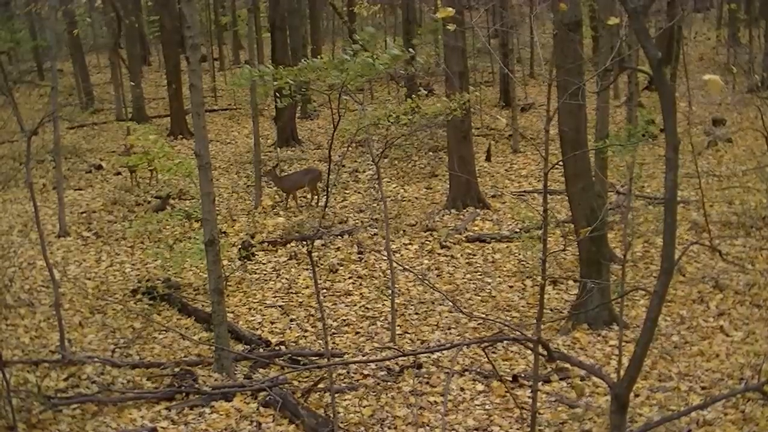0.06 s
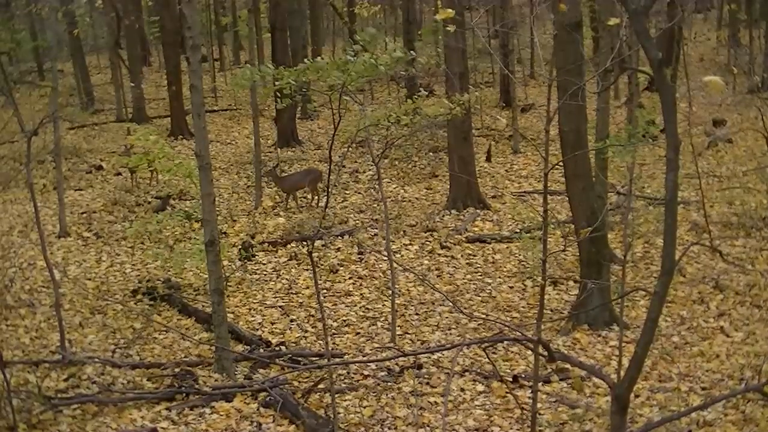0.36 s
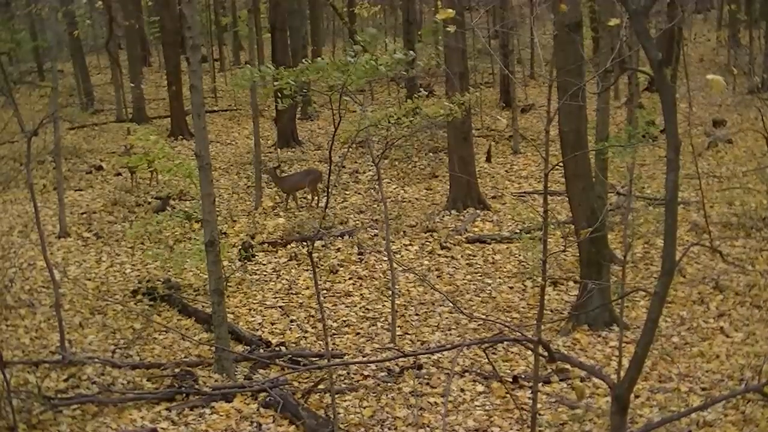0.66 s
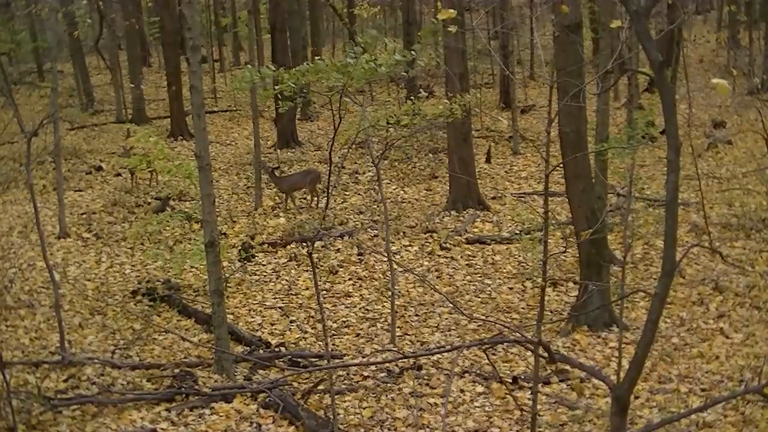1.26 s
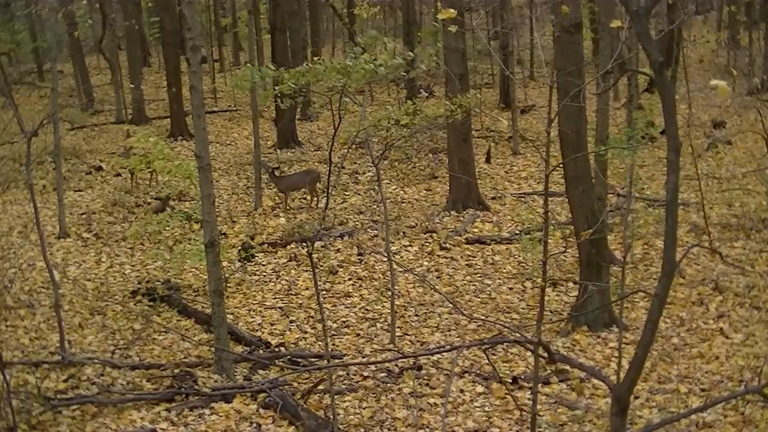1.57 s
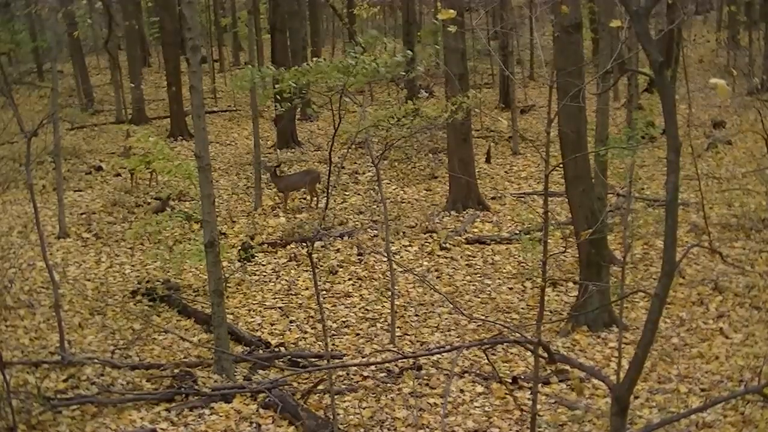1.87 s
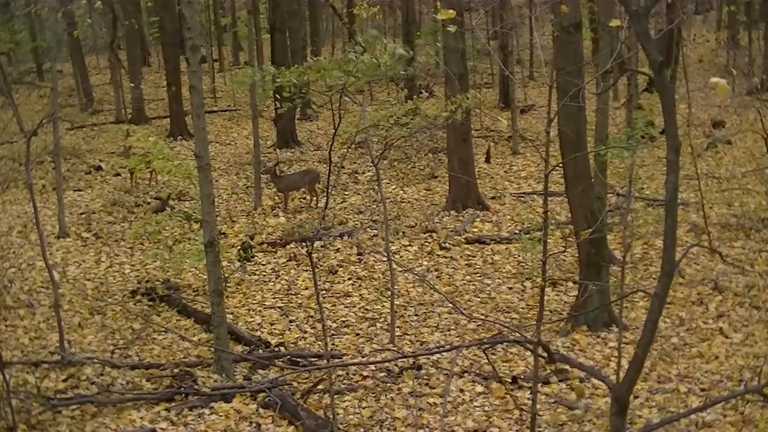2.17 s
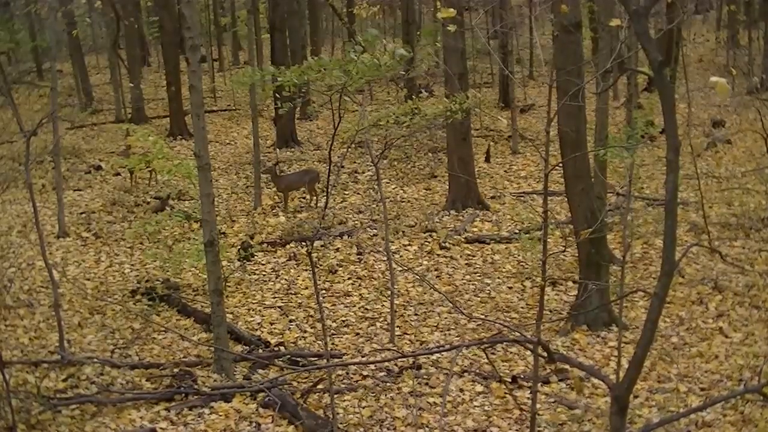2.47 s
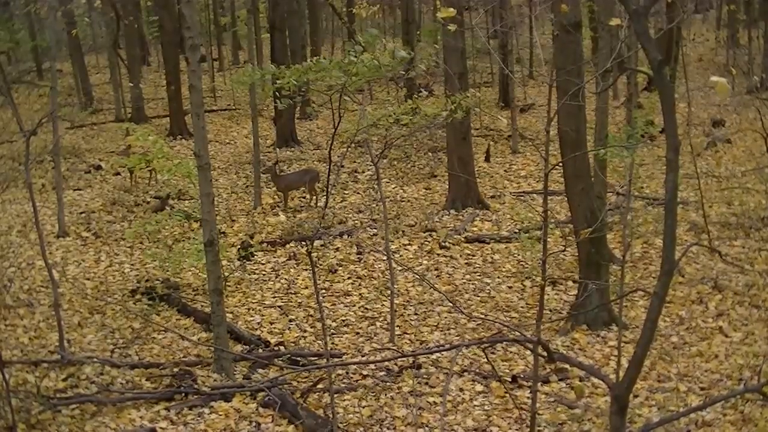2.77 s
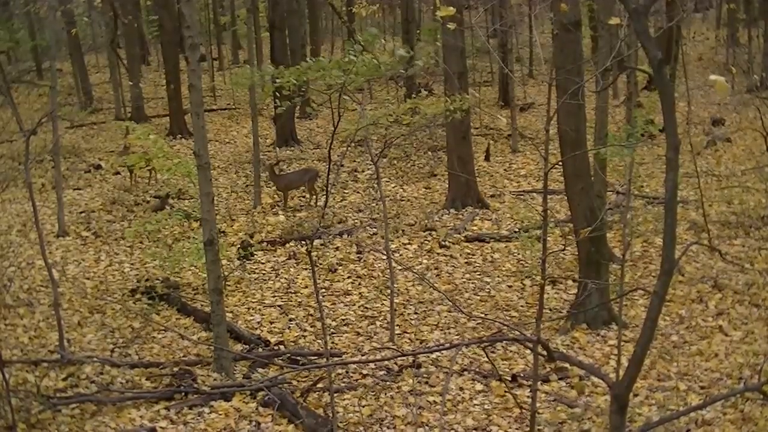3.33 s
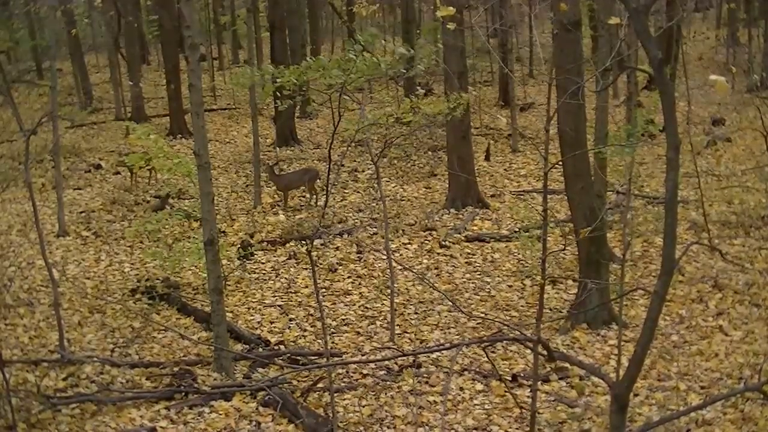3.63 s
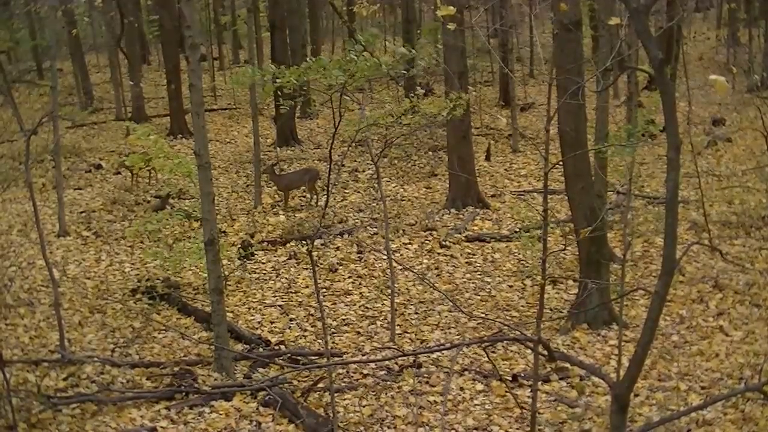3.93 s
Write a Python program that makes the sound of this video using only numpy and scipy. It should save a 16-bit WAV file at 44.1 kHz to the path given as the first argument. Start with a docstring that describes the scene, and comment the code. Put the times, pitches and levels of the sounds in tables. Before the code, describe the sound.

Steady, strong wind in a wood, occasionally buffeting the microphone with soft bumps.

```python
"""Strong, steady wind rushes through the crowns of an autumn wood. From the start a fitful draught
near the ground rumbles in the two microphone ports, and branches shed eddies in faint, hollow moans.
From 0.4 s a few high chirps, probably small birds, barely clear the rush. From 0.7 s the draught's
sharpest eddies land as soft bumps. Dry leaves rustle briefly at 1.6 and 1.8 s.
The bumps come thickest around 3.4 s."""
import sys
import numpy as np
from scipy import signal
from scipy.fft import rfft, irfft
from scipy.io import wavfile
from scipy.ndimage import uniform_filter1d

SR = 44100
rng = np.random.default_rng(int(sys.argv[2]) if len(sys.argv) > 2 else 0)


def waveform_to_disk(signal):
    """Save audio, clipped to [-1, 1], as 16-bit WAV at the path in sys.argv[1]."""
    frames = np.transpose(np.atleast_2d(signal))
    scaled = np.clip(frames, -1, 1) * 32767
    samples = np.round(scaled).astype(np.int16)
    wavfile.write(sys.argv[1], SR, samples)


N = 176400
T = np.arange(N) / SR
HZ = np.fft.rfftfreq(N, 1 / SR)


def amp(db):
    """Decibels to gain."""
    return 10 ** (np.asarray(db) / 20)


def unit(x):
    """Scales to rms 1."""
    return x / np.sqrt(np.mean(x ** 2) + 1e-20)


def gains(points):
    """Gain at every frequency from (Hz, dB) points."""
    hz, db = np.transpose(points)
    return amp(np.interp(np.log(HZ + 1), np.log(hz + 1), db))


def noise(gain):
    """Noise with the given gain at every frequency, at rms 1."""
    return unit(irfft(rfft(rng.standard_normal(N)) * gain, N))


def wander(rate_hz):
    """Random drift up to about rate_hz, at rms 1."""
    return noise(np.exp(-(HZ / rate_hz) ** 2))


def patchy(x, depth_db, bins=14, frames=24):
    """Lets patches of the spectrum swell and fade on their own."""
    spectra = signal.stft(x, nperseg=1024, noverlap=768)[2]
    field = uniform_filter1d(rng.standard_normal(spectra.shape), bins, axis=0)
    field = unit(uniform_filter1d(field, frames, axis=1))
    return signal.istft(spectra * amp(depth_db * field), nperseg=1024, noverlap=768)[1][:N]


# Rush common to both ports. Each row: frequency in Hz, relative density in dB.
RUSH_SPECTRUM = [(20, -43), (45, -33), (90, -19), (190, -11), (280, -5.5), (420, 0.07), (660, 1),
                 (1050, -1.06), (1900, -5.5), (3200, -6), (4600, -9.5), (6300, -11), (9000, -17),
                 (12000, -25.5), (15700, -34)]
# Rush that differs between the ports. Each row: frequency in Hz, relative density in dB.
SIDE_SPECTRUM = [(20, -15), (90, -8), (350, 0), (700, 0), (1500, -3), (3200, -2.5), (6400, -7), (8000, -22),
                 (12000, -32), (15700, -45)]
# Each row: frequency in Hz, left minus right in dB.
RUSH_BALANCE = [(100, 1), (700, -1.3), (1400, -1), (3000, 0), (8000, -0.5)]
# Each row: time in seconds, roar gain in dB, hiss gain in dB.
RUSH_SWELL = [(0, -0.5, 0), (.45, 0, 0), (.8, 0, -0.3), (1.3, -0.4, -.1), (1.6, -1.3, .5), (2.1, -0.5, 0.3),
              (2.5, -1.2, 0.26), (3.1, -1.5, 0.45), (3.45, -1, 0), (4, 0, 0.3)]

def crowns(mid_db=-43, side_db=-60, crossover_hz=2700, flutter_db=0.32):
    """Countless far branches and leaves: a roar and a hiss that swell a little, alike in both ports."""
    times, roar_db, hiss_db = np.transpose(RUSH_SWELL)
    rush = patchy(noise(gains(RUSH_SPECTRUM)), depth_db=0.59)
    roar = irfft(rfft(rush) * np.exp(-(HZ / crossover_hz) ** 2), N)
    hiss = (rush - roar) * amp(np.interp(T, times, hiss_db) + flutter_db * wander(rate_hz=12))
    mid = amp(mid_db) * (roar * amp(np.interp(T, times, roar_db)) + hiss)
    side = amp(side_db) * noise(gains(SIDE_SPECTRUM))
    lean = np.sqrt(gains(RUSH_BALANCE))
    return irfft(rfft([mid + side, mid - side]) * [lean, 1 / lean], N)


# Turbulence in a port. Each row: frequency in Hz, relative density in dB.
RUMBLE_SPECTRUM = [(20, -48), (45, -30), (85, -10.5), (130, 0), (170, 1.5), (270, -1.5), (450, -11),
                   (800, -21.5), (2000, -75)]
# Each row: time in seconds, left and right strength in dB before the trim.
DRAUGHT_STRENGTH = [(0.0, -50, -52), (0.07, -69, -71), (0.25, -46, -59), (0.35, -44, -53), (0.41, -57, -73),
                    (0.46, -62, -49), (0.54, -48, -43), (0.6, -48, -74), (0.71, -52, -42.5),
                    (0.83, -46, -56), (0.91, -46.5, -44), (0.99, -41.5, -46), (1.12, -49, -60),
                    (1.249, -46.5, -43), (1.3, -64, -72), (1.55, -53, -68), (1.72, -61, -68),
                    (1.85, -64, -64), (1.88, -50, -52), (2.12, -55, -70), (2.35, -48, -48),
                    (2.42, -59, -51), (2.49, -45.5, -52.5), (2.62, -57, -59), (2.66, -54, -51),
                    (2.73, -42, -52), (2.85, -73, -67), (3.05, -77, -71), (3.14, -46.5, -55),
                    (3.24, -38, -46), (3.32, -55, -67), (3.37, -54, -47), (3.42, -48, -41),
                    (3.53, -43, -61), (3.62, -51, -48), (3.76, -51, -64), (3.83, -46, -38.5),
                    (3.99, -41, -55)]

def draught(trim_db=-2.5, lump_db=3):
    """Lumpy turbulence, unrelated in the two ports, follows the air speed at each."""
    times, *ports_db = np.transpose(DRAUGHT_STRENGTH)
    ports = []
    for strength_db in ports_db:
        rumble = unit(noise(gains(RUMBLE_SPECTRUM)) * amp(lump_db * wander(rate_hz=45)))
        ports.append(amp(trim_db + np.interp(T, times, strength_db)) * rumble)
    return np.array(ports)


# Each row: middle in seconds, length in seconds, pitch in Hz, level in dB.
BRANCH_MOANS = [(0.027, 0.093, 655, -51), (0.183, 0.19, 670, -58), (1.2, 0.38, 724, -59)]

def moans(half_width_hz=18):
    """Air sheds eddies from the branches: a faint hollow tone that comes and goes."""
    out = np.zeros(N)
    for middle_s, length_s, pitch_hz, level_db in BRANCH_MOANS:
        tone = noise(1 / (1 + ((HZ - pitch_hz) / half_width_hz) ** 2))
        out += amp(level_db) * tone * np.exp(-(2 * (T - middle_s) / length_s) ** 2)
    return out


# Each row: middle in seconds, length in seconds, pitch in Hz, level in dB, fall in Hz per second.
BIRD_CHIRPS = [(.39, .08, 8920, -62, 900), (1.569, .016, 8200, -56, 900), (2.074, 0.053, 3310, -55, 900),
               (2.467, .06, 3084, -49.5, 6000), (3.307, 0.2, 9300, -65.5, 900),
               (3.448, 0.092, 8720, -59, 300)]

def chirps(waver_hz=140, echo_db=-1, echo_t60_s=0.32):
    """Thin wavering notes that fall slightly, smeared by echoes from the trunks."""
    drift_hz = waver_hz * wander(rate_hz=94)
    notes = np.zeros(N)
    for middle_s, length_s, pitch_hz, level_db, fall_hz_per_s in BIRD_CHIRPS:
        near = abs(T - middle_s) < length_s / 2
        t = T[near] - middle_s
        cycles = np.cumsum(pitch_hz + drift_hz[near] - fall_hz_per_s * t) / SR
        envelope = amp(level_db) * np.sqrt(2) * np.cos(np.pi * t / length_s)
        notes[near] += envelope * np.sin(2 * np.pi * cycles)
    tail = rng.standard_normal(N) * amp(-60 * T / echo_t60_s)
    echoes = signal.fftconvolve(notes, tail / np.linalg.norm(tail))[:N]
    return notes + amp(echo_db) * echoes


# Each row: middle in seconds, port (0 left, 1 right), envelope peak in dB before the low cut,
# centre frequency in Hz, Gaussian half length in cycles.
EDDY_BUMPS = [(0.734, 1, -31, 249, 0.73), (.741, 1, -26.5, 350, 0.42), (.751, 0, -27, 213, 0.38),
              (0.904, 1, -31.5, 282, 0.46), (0.975, 0, -34, 200, .5), (0.987, 0, -35, 160, 0.69),
              (1.18, 0, -40, 240, 0.59), (1.872, 1, -37, 280, .45), (1.886, 0, -29, 230, 0.29),
              (2.36, 1, -32, 175, 0.39), (2.367, 0, -20.5, 278, 0.45), (2.662, 1, -33.5, 185, 0.43),
              (2.668, 0, -30, 250, .5), (2.728, 0, -33, 170, 0.27), (3.381, 1, -33, 200, .4),
              (3.389, 1, -30, 220, 0.32), (3.407, 1, -31, 230, .45), (3.414, 0, -24, 170, .42),
              (3.42, 0, -30.5, 470, 0.71), (3.436, 0, -30, 260, 0.38), (3.44, 1, -32, 290, 0.4),
              (3.459, 0, -27, 247, 0.35), (3.521, 0, -28.5, 470, 0.63), (3.824, 0, -30, 280, 0.42),
              (3.892, 0, -32, 180, .45), (3.924, 0, -24, 260, .45), (3.934, 0, -24.5, 247, .55)]

def bumps(glide_per_s=56, wake_db=-13.5, wake_s=0.0063, low_cut_hz=80):
    """Each eddy gives one port a quickening push of a cycle or two, wrapped in a short turbulent wake."""
    out = np.zeros((2, N))
    turbulence = noise(gains(RUMBLE_SPECTRUM))
    phases = rng.uniform(-np.pi, np.pi, len(EDDY_BUMPS))
    for (middle_s, port, peak_db, centre_hz, half_cycles), phase in zip(EDDY_BUMPS, phases):
        near = abs(T - middle_s) < 0.05
        t = T[near] - middle_s
        cycles = centre_hz * np.expm1(glide_per_s * t) / glide_per_s
        push = np.exp(-0.5 * (cycles / half_cycles) ** 2) * np.cos(2 * np.pi * cycles + phase)
        wake = amp(wake_db) * turbulence[near] * np.exp(-abs(t) / wake_s)
        out[int(port), near] += amp(peak_db) * (push + wake)
    low_cut = signal.butter(2, low_cut_hz, "highpass", fs=SR, output="sos")
    return signal.sosfiltfilt(low_cut, out)


# Each row: frequency in Hz, relative density in dB.
LEAF_SPECTRUM = [(500, -16), (2500, 4), (6000, 6), (8500, 3), (10500, -3), (13000, -17), (16000, -20)]
# Each row: start in seconds, level in dB, decay time constant in seconds.
LEAF_RUSTLES = [(1.565, -47, .012), (1.61, -49.5, .05), (1.837, -40.5, 0.0083), (1.857, -48, 0.079)]

def leaves(rise_s=0.001, crackle_depth_db=3):
    """Stirred dry leaves: short bursts of fine crackle that start quickly and die away."""
    grains = rng.standard_normal(N) * amp(crackle_depth_db * wander(rate_hz=900))
    crackle = unit(irfft(rfft(grains) * gains(LEAF_SPECTRUM), N))
    envelope = np.zeros(N)
    for start_s, level_db, decay_s in LEAF_RUSTLES:
        age_s = np.maximum(T - start_s, 0)
        envelope += amp(level_db) * np.minimum(age_s / rise_s, 1) * np.exp(-age_s / decay_s)
    return crackle * envelope


def scene():
    """The wood ahead, and the wind on the microphone."""
    return crowns() + draught() + moans() + chirps() + bumps() + leaves()


def record(dry, cutoff_hz=15750):
    """A steep low-pass limits the band."""
    low_pass = signal.firwin(801, cutoff_hz, window=("kaiser", 9), fs=SR)
    return signal.oaconvolve(dry, low_pass[None], "same")


dry = scene()
out = record(dry)
waveform_to_disk(out)
```